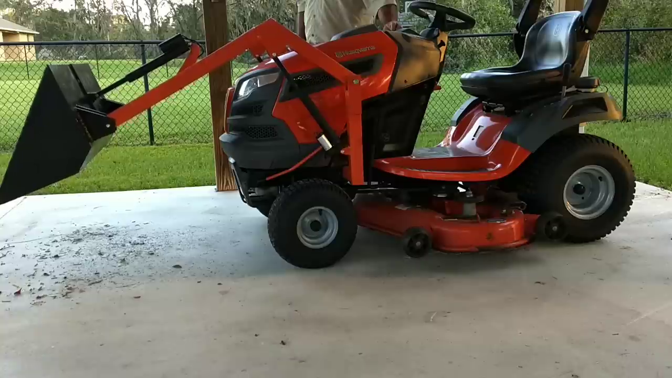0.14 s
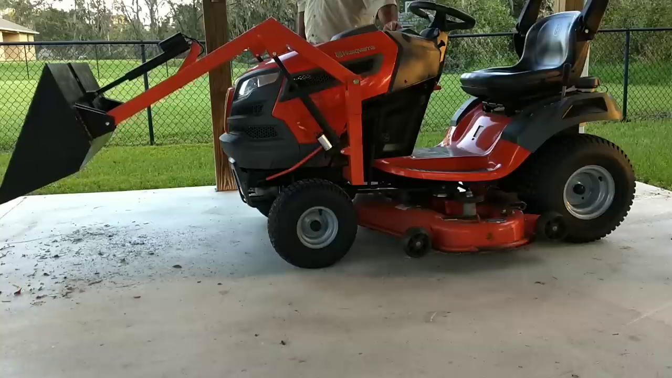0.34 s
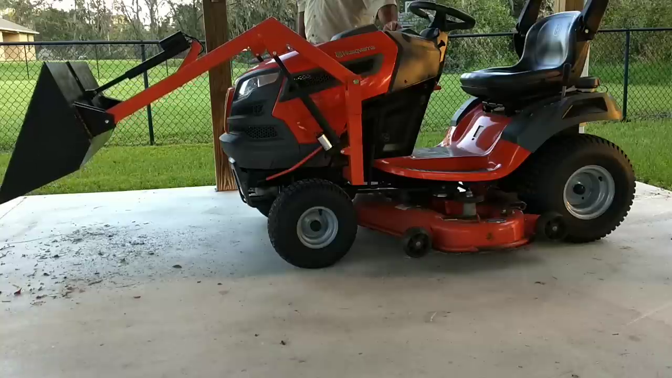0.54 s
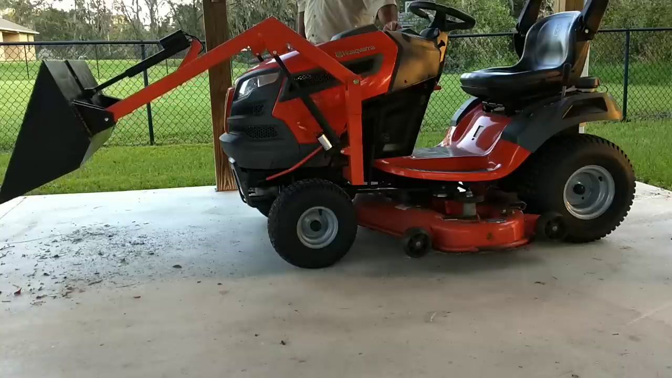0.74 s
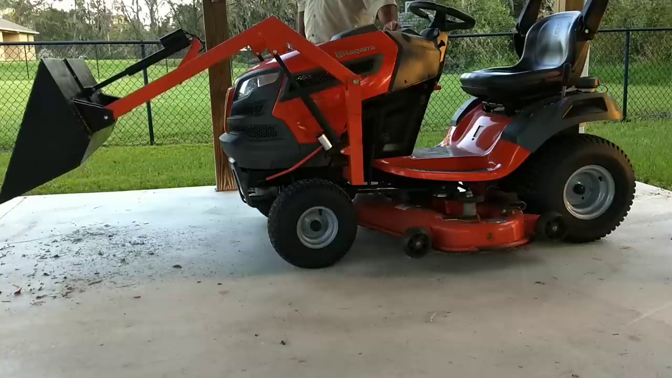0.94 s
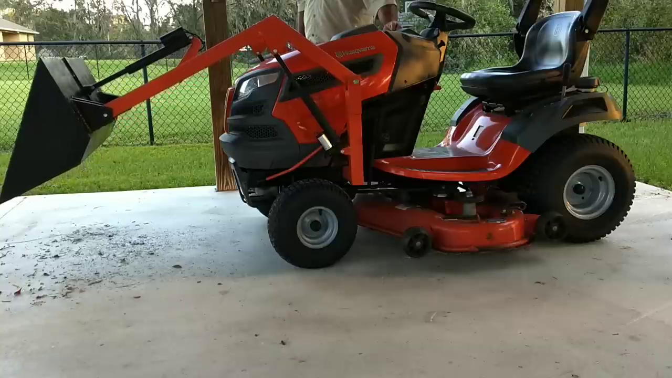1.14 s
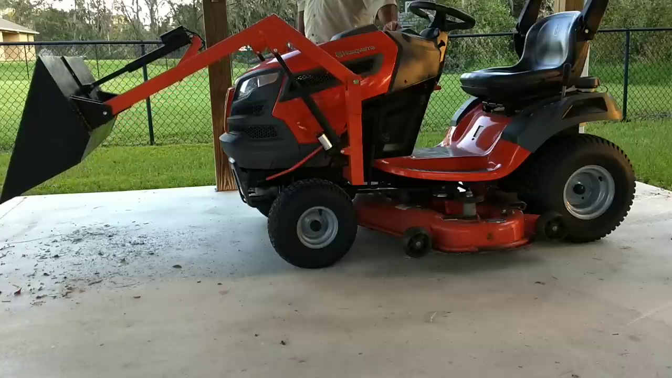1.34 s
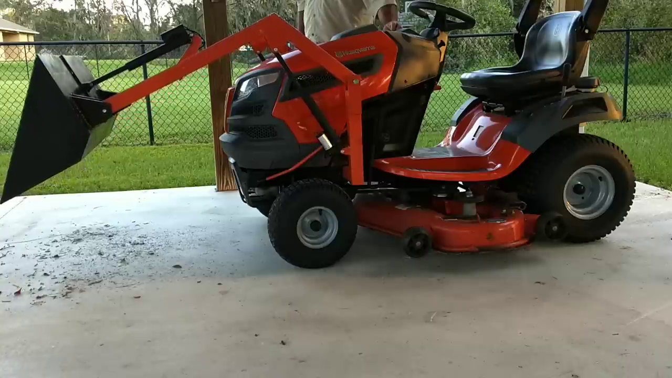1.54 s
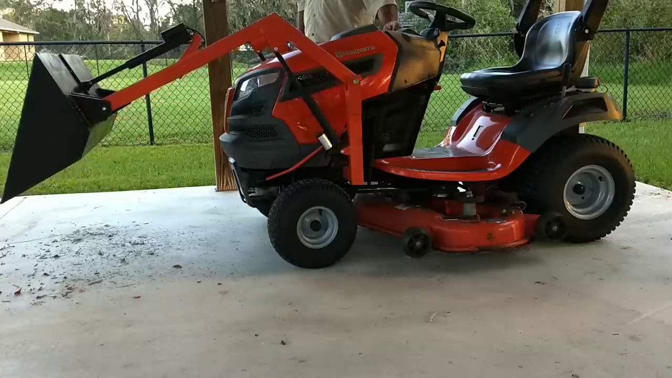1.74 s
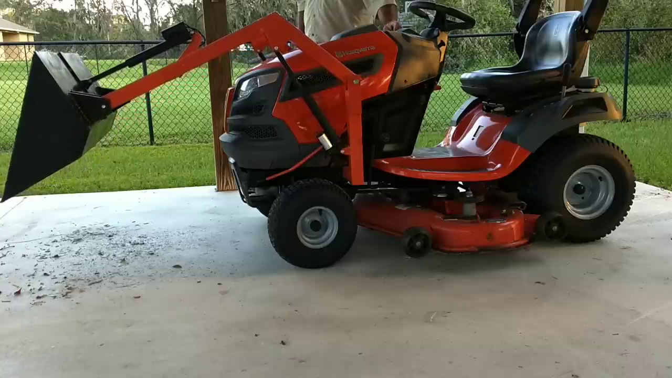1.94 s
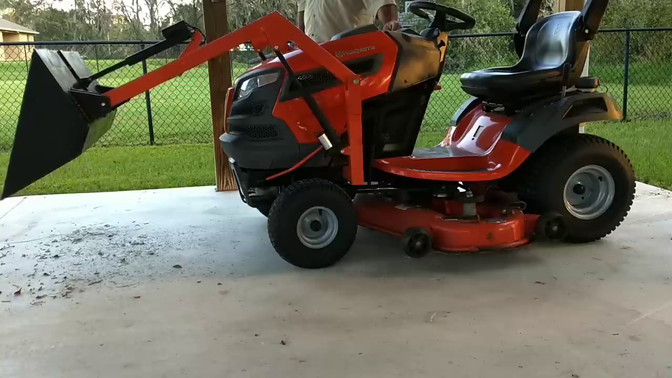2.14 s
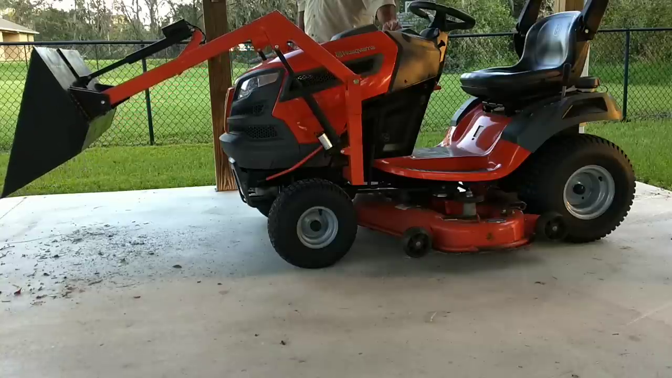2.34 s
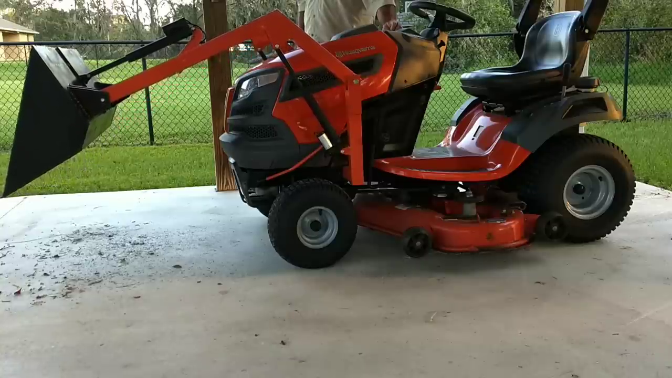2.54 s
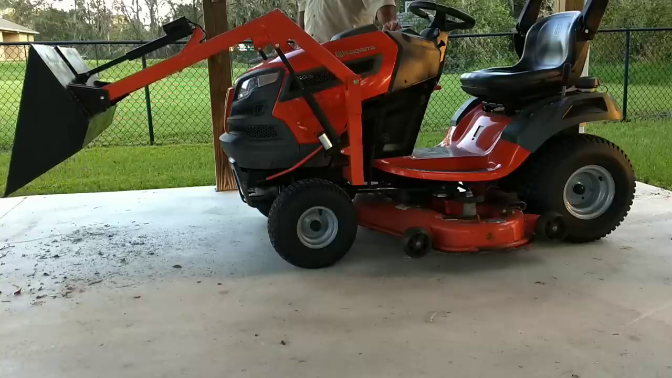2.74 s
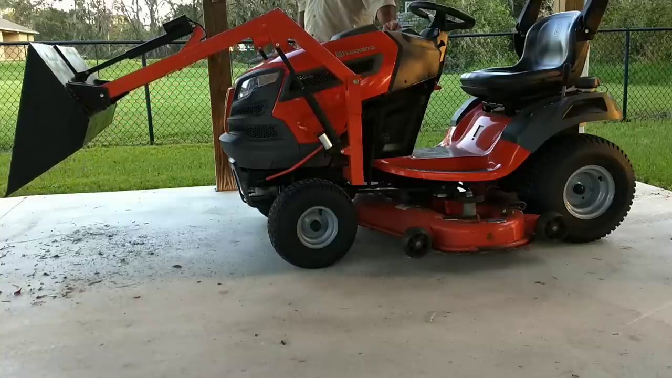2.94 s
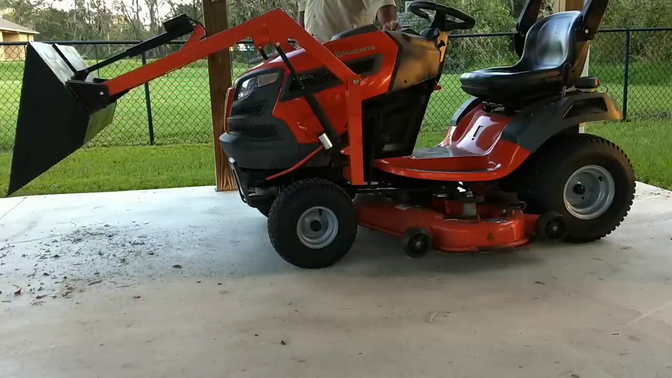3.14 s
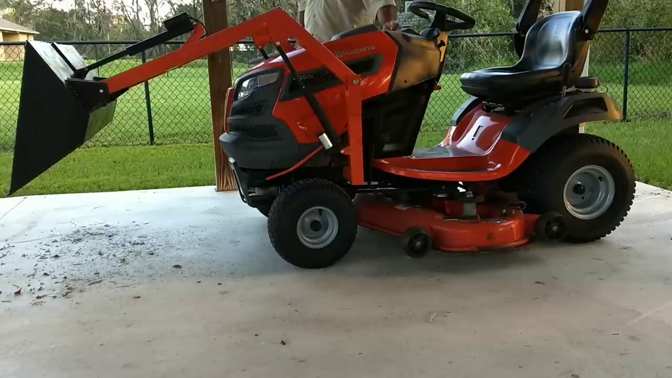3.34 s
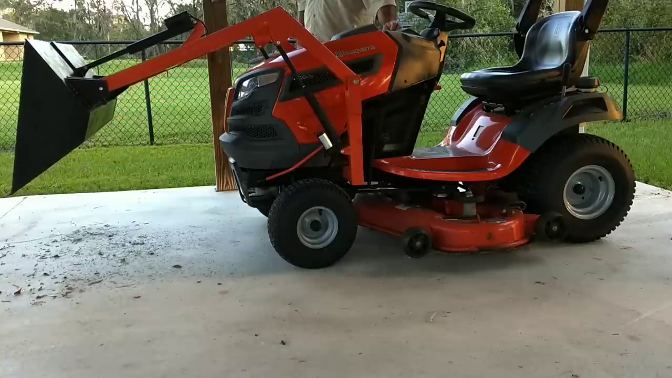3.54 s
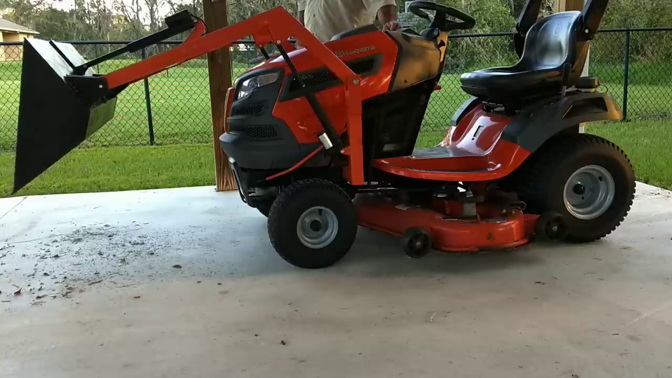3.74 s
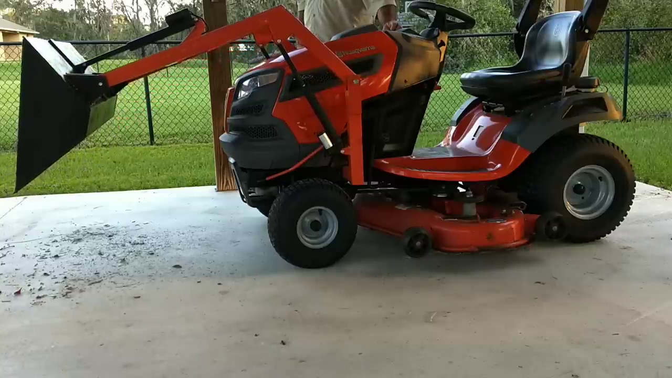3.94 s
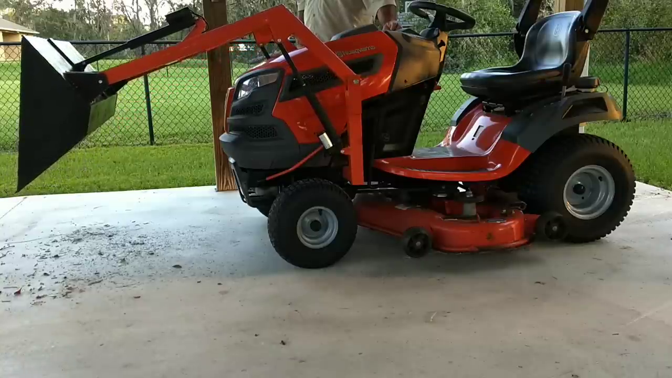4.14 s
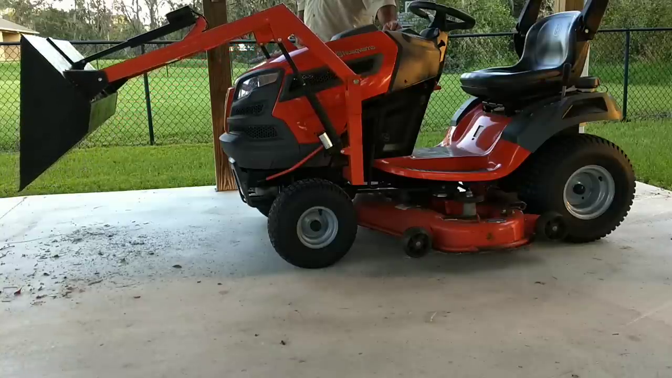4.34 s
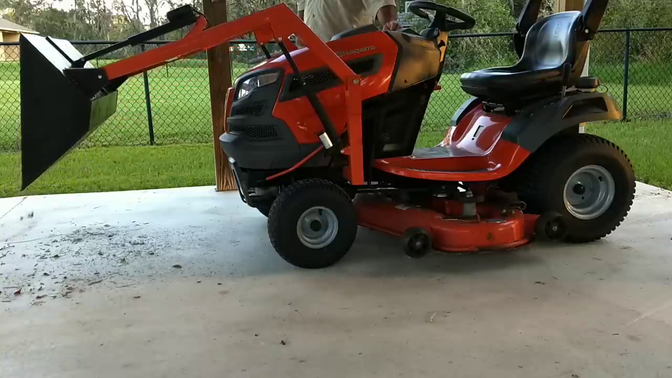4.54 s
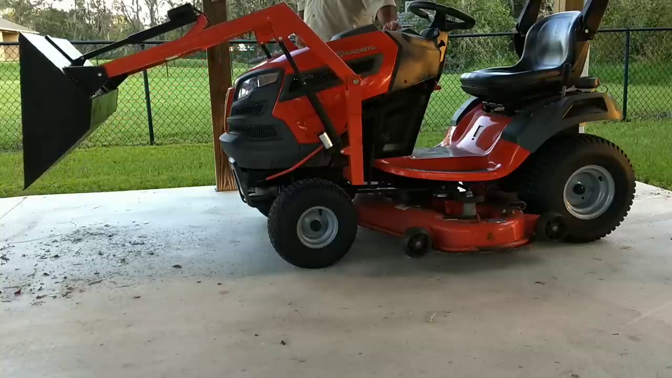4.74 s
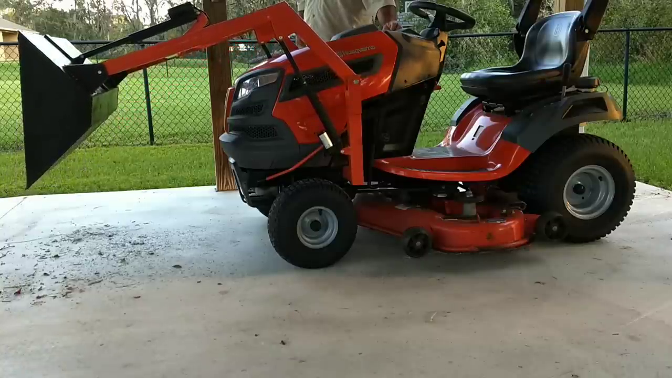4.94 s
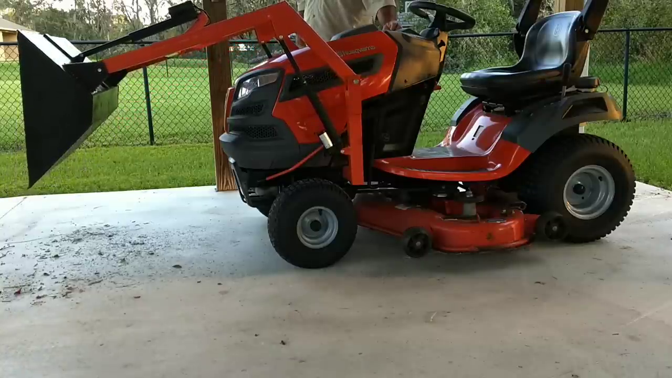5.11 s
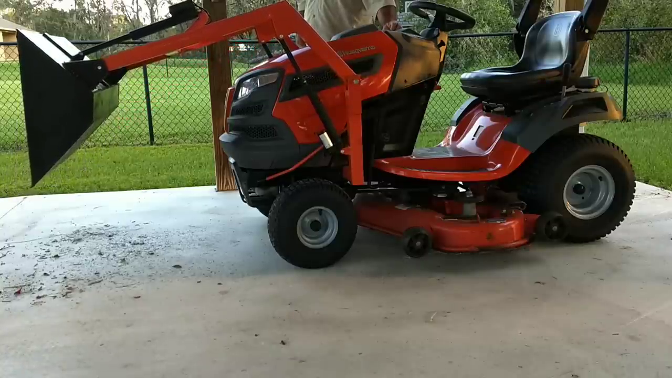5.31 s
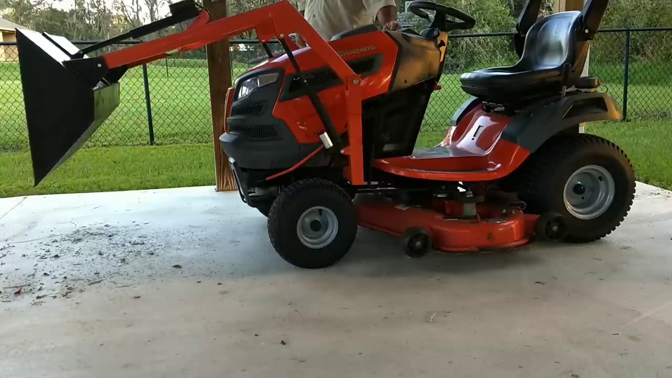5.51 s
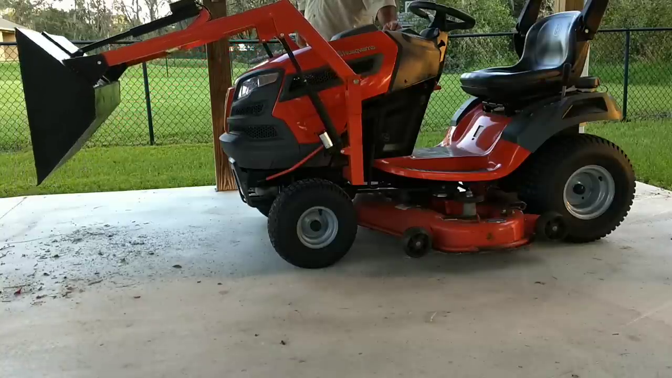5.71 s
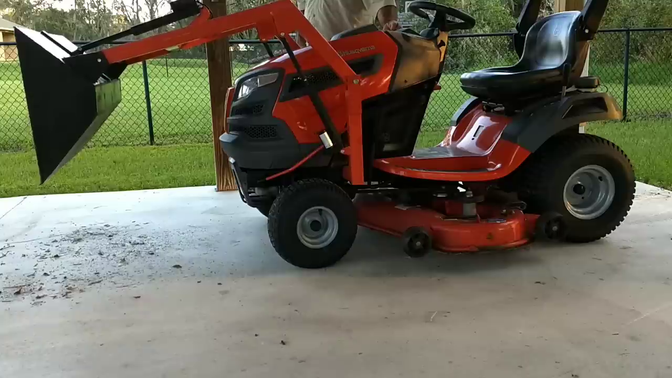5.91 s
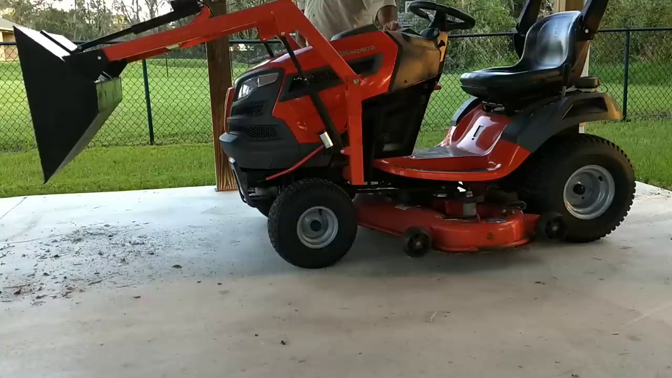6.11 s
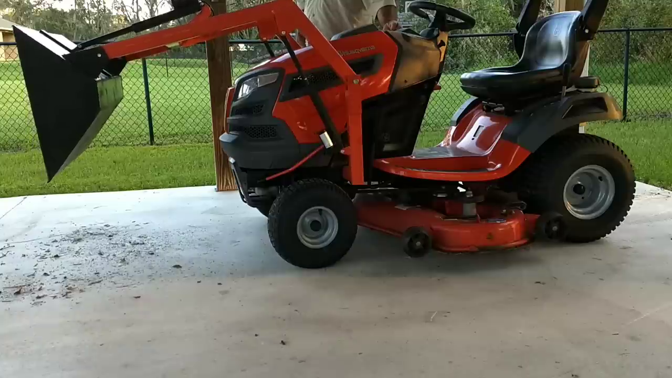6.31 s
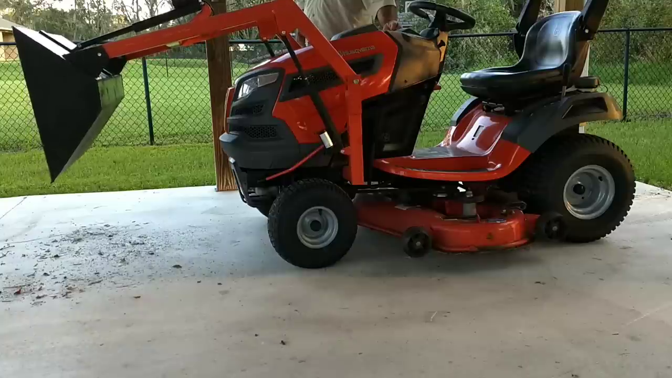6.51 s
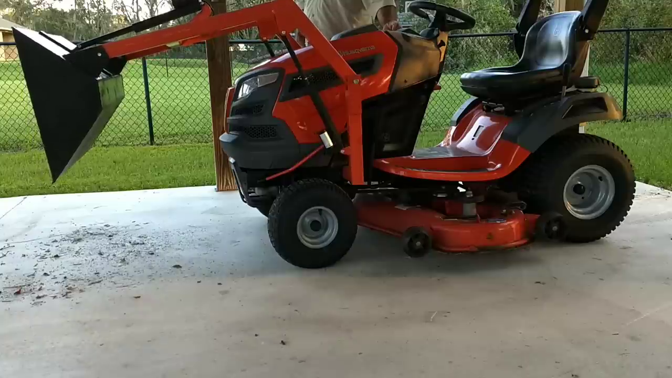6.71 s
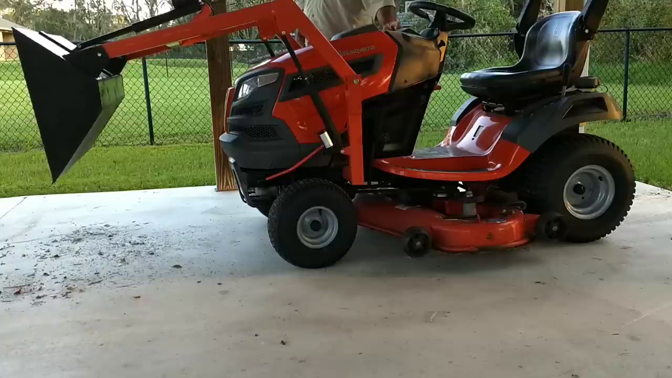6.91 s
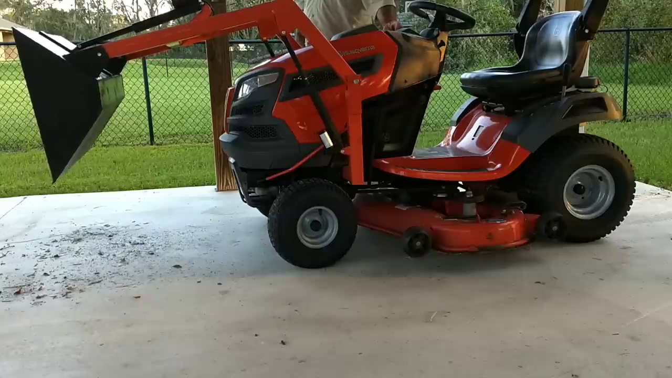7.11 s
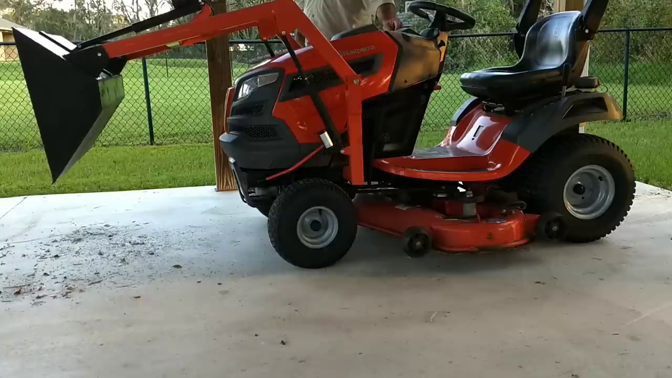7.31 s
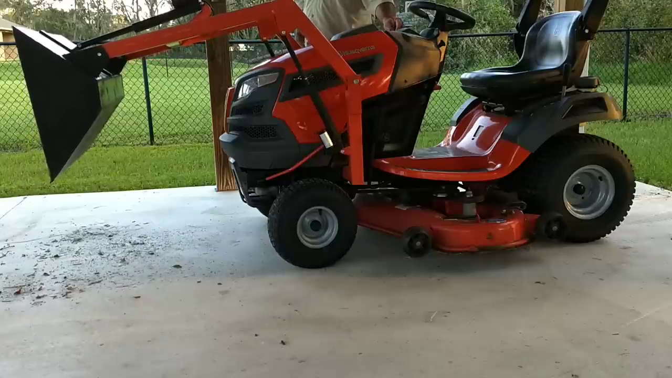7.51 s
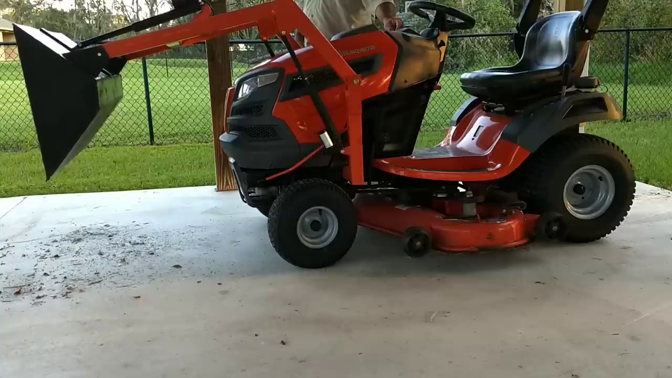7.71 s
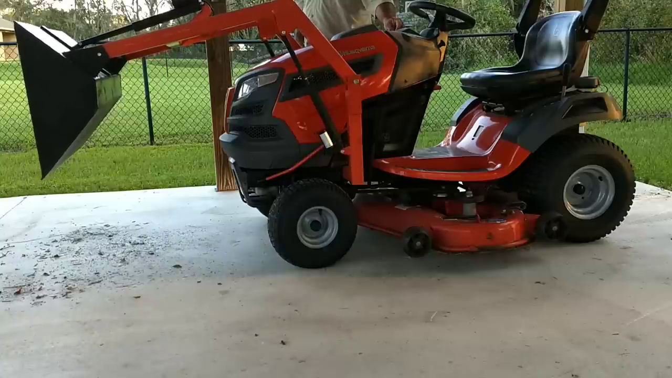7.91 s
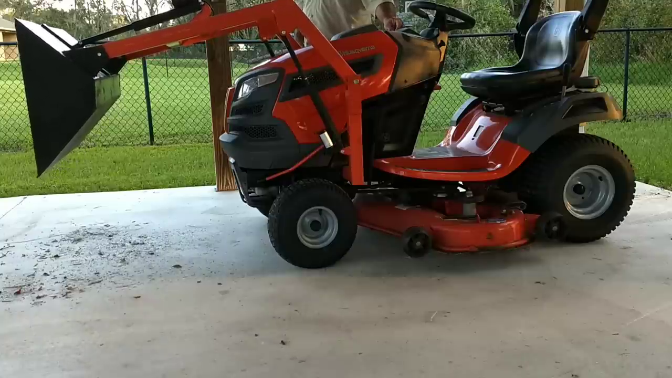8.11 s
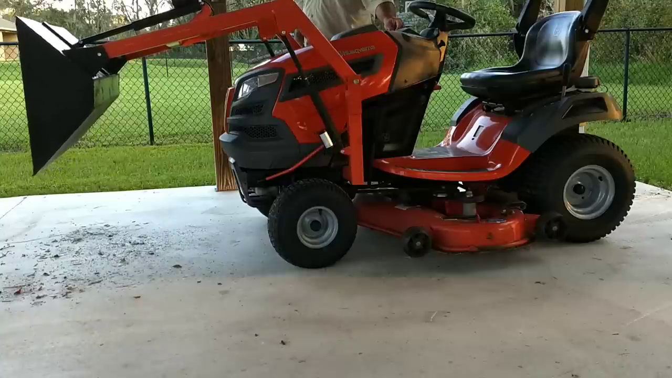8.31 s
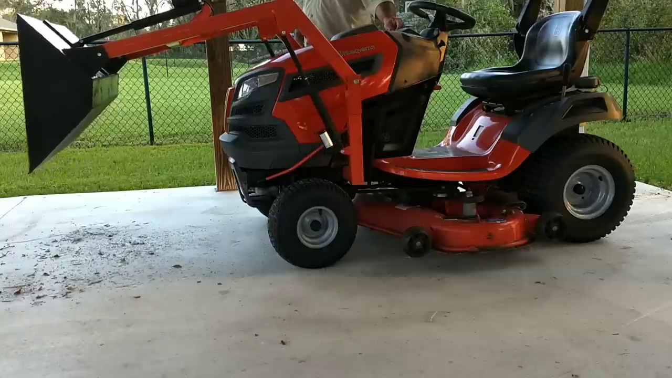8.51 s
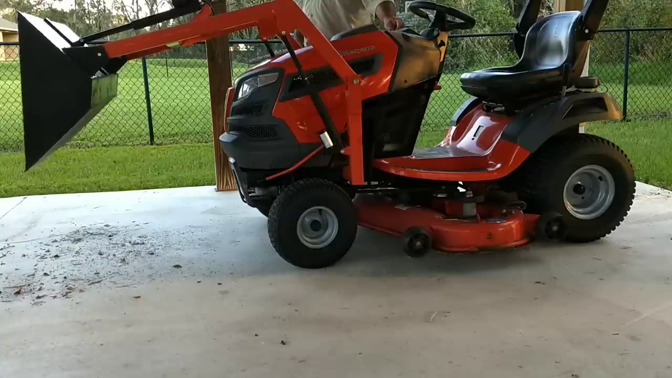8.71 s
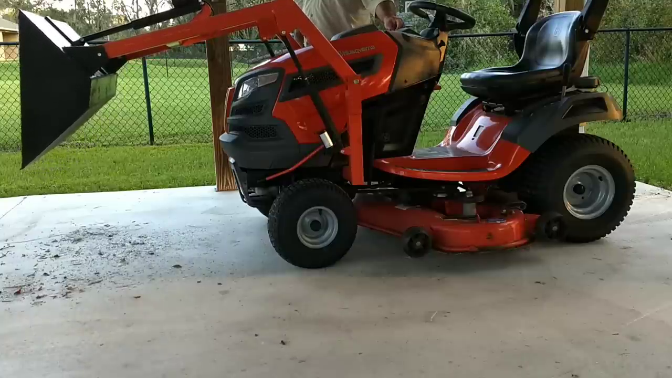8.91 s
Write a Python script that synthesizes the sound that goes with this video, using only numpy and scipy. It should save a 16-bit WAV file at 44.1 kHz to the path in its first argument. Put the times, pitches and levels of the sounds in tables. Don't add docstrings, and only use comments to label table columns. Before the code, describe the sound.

Two electric screw actuators whine harshly as they raise a small tractor's steel bucket, clank to a stop, pause about a second, then whine again, lowering.

```python
import sys
import numpy as np
from scipy import signal
from scipy.fft import rfft, irfft
from scipy.io import wavfile
from scipy.ndimage import uniform_filter1d

SR = 44100
rng = np.random.default_rng(int(sys.argv[2]) if len(sys.argv) > 2 else 0)


def gain_from_db(level_db):
    decades = np.asarray(level_db, float) / 20
    return 10 ** decades


def to_wav(s):
    ch = np.atleast_2d(s).T
    pcm = np.round(np.clip(ch, -1, 1) * 32767)
    wavfile.write(sys.argv[1], SR, pcm.astype(np.int16))


N = 394694
T = np.arange(N) / SR

BARS = 12
STOP_S, COAST_S = 6.45, .12
START_S, SPIN_UP_S = 7.447, .012
SLACK_ENDS_S, CATCH_S = 7.765, .02
LIFTING = T < START_S - .2

# whine/dB, overtones/dB, hiss/dB, gear mesh/dB
STAGE_LEVELS = [(0, -29.5, -33, -66), (0, -28, -31, -55), (-23, -34.5, -38, -47), (-33.5, -33.5, -37, -43)]


def level(x, db):
    return x * gain_from_db(db) / np.sqrt(np.mean(x ** 2))


def colour(x, points):
    hz, db = np.transpose(points)
    f = np.maximum(np.fft.rfftfreq(N, 1 / SR), 1)
    gain_db = np.interp(np.log(f), np.log(hz), db)
    return irfft(rfft(x) * gain_from_db(gain_db), N)


def ring(x, hz, width_hz):
    return signal.lfilter(*signal.iirpeak(hz, hz / width_hz, SR), x)


def walk(rate):
    k = int(SR / rate)
    held = np.repeat(rng.standard_normal(N // k + 1), k)
    return 1.274 * uniform_filter1d(uniform_filter1d(held, k), k)[:N]


def step(at_s, width_s):
    return .5 + .5 * np.tanh((T - at_s) / width_s)


def staged(table):
    climb, caught = np.clip(T / STOP_S, 0, 1), step(SLACK_ENDS_S, CATCH_S)
    return [np.where(LIFTING, bottom + (top - bottom) * climb, slack + (down - slack) * caught)
            for bottom, top, slack, down in np.transpose(table)]


def air():
    # f/Hz, density/dB per Hz
    far_colour = [(30, -49), (80, -7), (180, -1), (400, -3.5), (1000, -15), (2500, -21.5), (7000, -36),
                  (12000, -31.5), (15500, -28)]
    # f/Hz, density/dB per Hz
    rumble_colour = [(30, -29), (80, -6), (170, -0.5), (400, -8), (900, -10.5), (2000, -40)]
    gust_db = 3.5 * np.exp(-((T - 6.64) / 0.38) ** 2)
    traffic_db = 6.5 * step(7.5, 0.28)
    swell = gain_from_db(-53.5 + gust_db + traffic_db + 1.42 * walk(20))
    far = swell * level(colour(rng.standard_normal(N), far_colour), 5.9)
    wind = [swell * level(colour(rng.standard_normal(N), rumble_colour), 4.4) for _ in range(2)]
    return far, np.array(wind)


def knocks(rows, crack):
    out, t = np.zeros(N + SR), np.arange(SR // 5) / SR
    onset = 1 - np.exp(-t / .0012)
    for s, db, hz, t60 in rows:
        burst = crack * uniform_filter1d(rng.standard_normal(len(t)), size=6) * np.exp(-t / 0.0046)
        tone = np.sin(2 * np.pi * hz * t) * 1000 ** (-t / t60)
        out[int(s * SR):][:len(t)] += gain_from_db(db) * (burst + tone) * onset
    return out[:N]


def wind_taps():
    # t/s, peak/dB, f/Hz
    taps = [(6.732, -32, 272), (6.754, -36, 269), (6.802, -33, 283), (6.821, -32, 275), (6.862, -37, 159),
            (7.005, -36, 272), (7.035, -38, 207), (7.083, -32, 242), (7.093, -36, 450), (7.274, -34, 299),
            (7.294, -36, 495), (7.312, -38, 175), (7.373, -36, 159), (7.411, -36, 180)]
    dull = uniform_filter1d(knocks([(*row, .04) for row in taps], .5), size=5)
    return gain_from_db(7) * dull


def switch_clinks():
    # t/s, peak/dB, f/Hz, t60/s
    clinks = [
        (6.745, -50, 2360, .1),
        (7.172, -32.5, 1284, 0.03),
        (7.18, -40, 2118, .08),
    ]
    return knocks(clinks, 1.0)


def shudders():
    # t/s, level/dB, f/Hz, width/Hz, t60/s
    bursts = [
        (6.46, -39, 300, 230, 1.0),
        (6.46, -27.5, 1000, 510, 0.57),
        (6.5, -35.5, 267, 14, 1.2),
        (6.52, -36, 524, 19, 0.77),
        (7.47, -31.5, 259, 56, 0.82),
        (7.76, -35, 910, 16, 0.65),
    ]
    out = 0
    for s, db, hz, width_hz, t60 in bursts:
        age = np.maximum(T - s, 0)
        envelope = (1 - np.exp(-age / 0.008)) * 1000 ** (-age / t60)
        out = out + level(ring(rng.standard_normal(N), hz, width_hz), db) * envelope
    return out


def speeds():
    # t/s, first motor bar rate f/Hz, second motor bar rate f/Hz
    lowering = [
        (7.43, 825, 890),
        (7.51, 854, 908),
        (7.6, 870, 913),
        (7.735, 868, 905),
        (7.765, 930, 904),
        (7.79, 966, 938),
        (7.85, 976, 945),
        (8.5, 975, 965),
        (8.95, 976, 970),
    ]
    s, *columns = np.transpose(lowering)
    first_down, second_down = (np.interp(T, s, column) for column in columns)
    ease = np.clip((T - 6.1) / (STOP_S - 6.1), 0, 1) ** 2
    lift = 964 - 6.9 * np.minimum(T, STOP_S) + 14 * ease
    first_hz = np.where(LIFTING, lift, first_down)
    second_hz = np.where(LIFTING, lift + 12 * (1 - ease / 2), second_down)
    calm = 1 - .45 * step(4.7, 0.26)
    rock_hz = 10.5 * (1 - ease) * calm
    power = np.clip(1 - (T - STOP_S) / COAST_S, 0, 1) + step(START_S, SPIN_UP_S)
    return first_hz, second_hz, rock_hz, power


def motor(hz, voice_db, above_db, below_db):
    bar = 2 * np.pi * np.cumsum(hz + .9 * walk(60)) / SR
    shaft = bar / BARS
    above = gain_from_db(above_db + 5 * walk(7)) * np.sin(bar + shaft + 1.5 * walk(9))
    below = gain_from_db(below_db + 5 * walk(7)) * np.sin(bar - shaft + 1.5 * walk(9))
    overtones = 0
    for k, db in enumerate(voice_db, start=2):
        wobble = 1 + 2 * gain_from_db(-13) * np.cos(shaft + 1.5 * walk(8))
        db = db + 10.5 / (1 + ((k * hz - 2892) / 48) ** 2)
        overtones = overtones + gain_from_db(db + 2.2 * walk(14)) * wobble * np.sin(k * bar)
    return np.sqrt(2) * (np.sin(bar) + above + below), overtones, bar


def gears(bar, bar_b):
    # multiple of the mesh rate, level/dB
    mesh_lines = [(2, 2), (3, -5), (4, -9), (9, -49)]
    mesh_per_bar = .4
    out = sum(gain_from_db(db + 3 * walk(12)) * np.sin(k * mesh_per_bar * bar) for k, db in mesh_lines)
    out += gain_from_db(-8.5 + 1.6 * walk(13)) * np.sin(2 * mesh_per_bar * bar_b)
    catch = gain_from_db(-14 * np.exp(-((T - SLACK_ENDS_S - .015) / .045) ** 2))
    return out * catch * np.where(LIFTING, 1, step(START_S + .13, .04))


def brush_hiss(gate):
    # f/Hz, density/dB per Hz
    spark_colour = [(150, -14), (600, -4), (1100, 8), (2500, 5.5), (5200, -10), (7000, -11), (8500, -1.5),
                    (10000, 0.5), (12600, 4), (14000, -1), (15000, 2), (15500, -5)]
    return level(colour(gate * rng.standard_normal(N), spark_colour), 3.12)


def steel(gate):
    # f/Hz, width/Hz, level/dB
    modes = [(264.2, 8.9, 2.5), (478, 46, 6), (871, 30, 6), (943, 91, 4), (1035.3, 41, 10), (1349, 10.3, 6),
             (1818, 72, 8), (2130, 12, -35), (2960, 133, 8), (3770, 425, 14.5), (4623, 200, 10.5),
             (6040, 140, -23)]
    shake = gate * rng.standard_normal(N)
    rattle = sum(level(ring(shake, hz, width), db) * gain_from_db(0.26 * walk(4.4)) for hz, width, db in modes)
    bucket = level(ring(ring(shake, 938, 45), 935, 55), -12)
    return rattle, bucket


def rotor_hum(bar):
    # multiple of the shaft rate, level/dB
    hum_lines = [(2, -50), (3, -51), (7, -55)]
    return step(SLACK_ENDS_S, CATCH_S) * sum(gain_from_db(db) * np.sin(k * bar / BARS) for k, db in hum_lines)


def effort(screw):
    # crest t/s, crest level/dB, build/s, fade/s
    surges = [(.04, -16.5, .05, 0.13), (.16, -14.5, 0.11, 0.068), (.38, -16.5, .03, 0.039),
              (.48, -12.5, 0.087, 0.053), (.63, -23.5, .15, 0.25), (.79, -17, 0.1, .05),
              (.89, -18, 0.043, 0.057), (1.22, -15.5, 0.19, 0.16), (1.37, -15.5, 0.22, 0.053),
              (1.47, -15, 0.059, 0.12), (1.68, -13, 0.093, .09), (1.84, -17.5, 0.097, 0.3),
              (1.97, -15, 0.16, 0.31), (2.16, -15.5, 0.066, .6), (2.37, -17.5, 0.88, 0.52),
              (2.735, -14, 0.07, 0.82), (3.09, -28, .3, 0.04), (3.205, -14.5, 0.045, 0.041),
              (3.33, -15, 0.14, 0.053), (3.55, -13, 0.092, 0.16), (3.89, -21.5, 0.12, 0.27),
              (4.015, -14.5, 0.071, 0.046), (4.42, -18.5, 0.54, 0.13), (4.79, -14, 0.14, 0.031),
              (5.12, -16, 0.065, .18), (5.52, -16, 0.19, 0.17), (5.925, -15, 0.18, 0.068),
              (6.15, -22.5, 0.44, 0.067), (6.27, -21, 0.1, 0.16), (6.43, -20, 0.14, 0.021)]
    # start level/dB, fall/dB per s
    ring_out = [(-23.5, 61), (-59, 56), (-76, 27)]
    surge = np.full(N, -28.0)
    for s, db, build, fade in surges:
        away = np.maximum((s - T) / build, (T - s) / fade)
        surge = np.maximum(surge, db - 13 * away)
    surge = uniform_filter1d(surge, size=int(.035 * SR))
    whine, over, hiss, _ = staged(STAGE_LEVELS)
    running = T < STOP_S + COAST_S / 2
    slack_swell = 20 * np.clip(T - SLACK_ENDS_S + 0.062, -1, 0)
    whine = np.where(running, surge + 1.8 * walk(45), whine + slack_swell)
    over = over + running * (0.077 * (surge + 24) + 1.45 * walk(18))
    hiss = hiss + running * (0.073 * (surge + 24) + 0.32 * np.cos(screw - 0.17) + 0.8 * walk(12))
    restart = step(START_S + 1.4 * SPIN_UP_S, SPIN_UP_S)
    after = np.maximum(T - STOP_S - COAST_S, 0)
    gains = []
    for db, coast_s, (start_db, fall_db) in zip((whine, over, hiss), (COAST_S, .06, .06), ring_out):
        drive = np.clip(1 - (T - STOP_S) / coast_s, 0, 1) ** 2 + restart
        gains.append(drive * gain_from_db(db) + (T > STOP_S) * gain_from_db(start_db - fall_db * after))
    return gains


def actuators():
    # multiples 2, 3, 4, 5, 6 of the bar rate, level/dB each
    voice = [(-1, -8.5, 1, -3, -19), (3.5, -13, -1, -6, -15.5), (2, -2, -6, -4, -5),
             (7, -12.5, -3.5, -6, -11)]
    # second motor in the whine/dB, in the overtones/dB,
    # line one shaft turn above the whine/dB, below it/dB
    shares = [(-9, -13, -13, -21), (-10, -13, -11.5, -18), (15, -10, -21, -25), (4, 5, -15, -3)]
    first_hz, second_hz, rock_hz, power = speeds()
    voice_db, mesh_db = staged(voice), staged(STAGE_LEVELS)[-1]
    whine_share_db, over_share_db, above_db, below_db = staged(shares)
    screw = 2 * np.pi * (np.cumsum(first_hz) / SR - .1 * first_hz[0]) / 367
    first_rocked = first_hz + rock_hz * np.cos(screw)
    second_rocked = second_hz + 0.716 * rock_hz * np.cos(screw + 2.206)
    whine_a, over_a, bar = motor(first_rocked, voice_db, above_db, below_db)
    whine_b, over_b, bar_b = motor(second_rocked, voice_db, above_db, below_db)
    share_whine, share_over = gain_from_db(whine_share_db), gain_from_db(over_share_db)
    whine = power * (whine_a + share_whine * whine_b) / np.hypot(1, share_whine)
    overtones = (over_a + share_over * over_b) / np.hypot(1, share_over)
    overtones *= gain_from_db(-14 * np.exp(-((T - SLACK_ENDS_S + .015) / .025) ** 2))
    once_a_turn = 1 + 0.11 * np.cos(bar / BARS + 3.2 * walk(12))
    gate = (1 + 0.24 * np.cos(bar)) * once_a_turn * gain_from_db(0.55 * walk(35))
    rattle, bucket = steel(gate)
    whine_gain, over_gain, hiss_gain = effort(screw)
    tones = gain_from_db(-4.5) * whine_gain * (whine + bucket)
    driven = power * (gain_from_db(-1.5) * over_gain * overtones + gain_from_db(mesh_db + 6.0) * gears(bar, bar_b))
    noise = hiss_gain * brush_hiss(gate) + gain_from_db(-19.0) * over_gain * rattle
    return tones + driven + rotor_hum(bar) + noise


def scene():
    near = actuators() + switch_clinks() + shudders()
    t = np.arange(SR // 2) / SR
    tail = uniform_filter1d(rng.standard_normal(len(t)), size=4) * 1000 ** (-t / .4) * (t > .008)
    tail *= gain_from_db(-17) / np.sqrt(np.sum(tail ** 2))
    far, wind = air()
    left = near + signal.fftconvolve(near, tail)[:N] + far
    early = np.roll(left, -20)
    right = -colour(early, [(8000, 1.35), (10000, 2.4), (12600, 5.6), (15500, 3.1)])
    taps = wind_taps()
    return np.array([left + taps, right + .1 * taps]) + wind


def banded_stereo(dry):
    # f/Hz, likeness of side and mid (0-1), side gain/dB, weaker one dropped below level/dB
    ports = [(100, .5, -1, -30), (500, .4, -9, -25), (1000, .3, -3, -12), (1600, .3, -3, -11),
             (2200, .2, 0, -11), (3300, .2, -1, -8), (3800, .5, -1.5, -12), (4400, .35, -1, -15),
             (5400, .15, 0, -7.5), (6700, .06, -1, -5), (7900, .1, -1, -3.5), (8700, .12, 0, -4),
             (9500, .45, 0, -12), (10500, .75, 0, -13), (12700, .9, 1, -12), (15500, .7, 2, -12)]
    band_starts = np.r_[0:40:4, 40:96:8, 96:144:12, 144, 160, 176, 196, 216, 240, 264, 292, 320:1025:32]
    mid_side = np.array([dry[0] + dry[1], dry[0] - dry[1]]) / 2
    f, _, (mid, side) = signal.stft(mid_side, SR, nperseg=2048)
    hz, *columns = np.transpose(ports)
    like, side_db, drop_db = (np.interp(f, hz, c)[:, None] for c in columns)
    bands = np.searchsorted(band_starts, np.arange(len(f)), side="right") - 1
    chance = rng.standard_normal((3, bands[-1] + 1, mid.shape[1]))
    slip, spill, doubt = np.sqrt(3) * uniform_filter1d(chance, size=3, axis=2)[:, bands]
    spread = np.sqrt(-2 * np.log(np.clip(like, .02, 1)))
    leak = gain_from_db(-15) * np.exp(2j * spill)
    turned = gain_from_db(side_db) * (side + leak * mid) * np.exp(1j * spread * slip)
    mid, side = mid + leak * side, turned
    power = []
    for z in (mid, side):
        smooth = uniform_filter1d(abs(z) ** 2, size=5, axis=1)
        power.append(np.add.reduceat(smooth, band_starts)[bands] + 1e-18)
    ratio_db = 10 * np.log10(power[1] / power[0])
    limit_db = drop_db + 2 * doubt
    mid, side = mid * (-ratio_db > limit_db), side * (ratio_db > limit_db)
    return signal.istft(np.array([mid + side, mid - side]), SR, nperseg=2048)[1][:, :N]


def low_pass(x):
    return signal.sosfilt(signal.butter(12, 16370, fs=SR, output="sos"), x)


def record(dry):
    top = signal.ellip(10, .2, 70, 15420, fs=SR, output="sos")
    bass = signal.butter(2, 55, "high", fs=SR, output="sos")
    mix = signal.sosfilt(np.vstack([top, bass]), banded_stereo(dry))
    return low_pass(mix)


dry = scene()
out = record(dry)
to_wav(out)
```